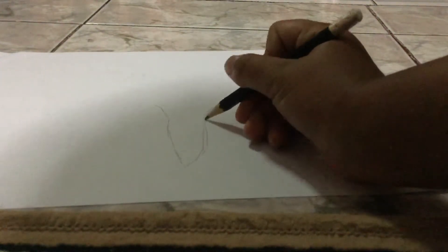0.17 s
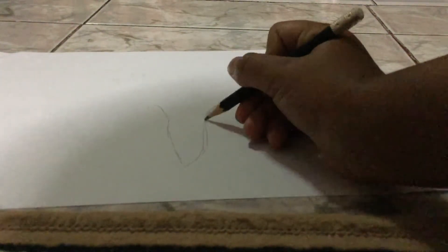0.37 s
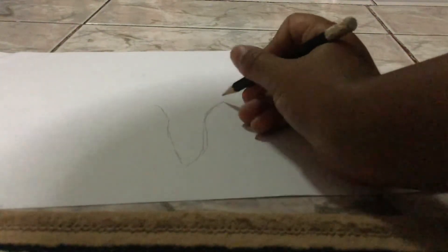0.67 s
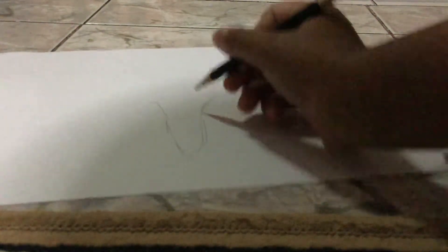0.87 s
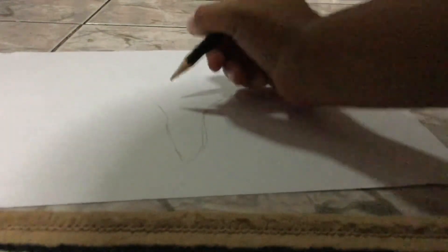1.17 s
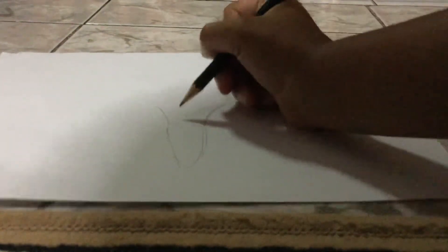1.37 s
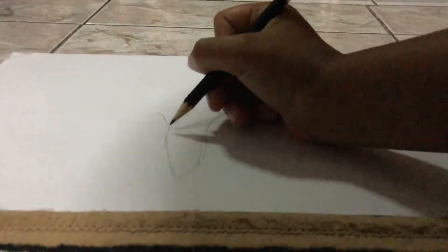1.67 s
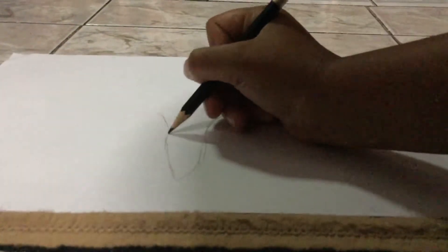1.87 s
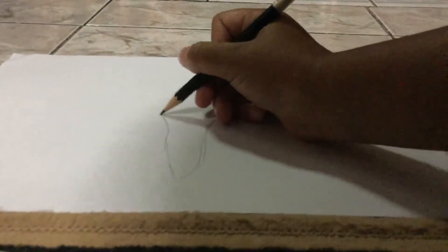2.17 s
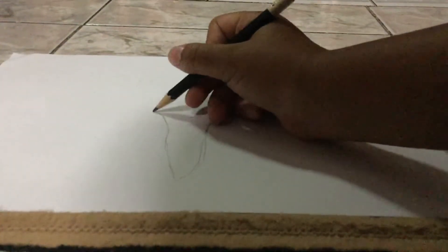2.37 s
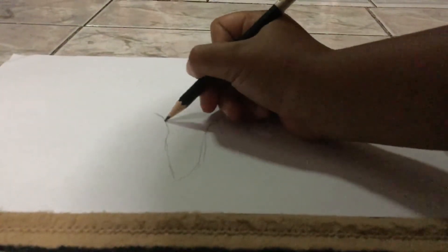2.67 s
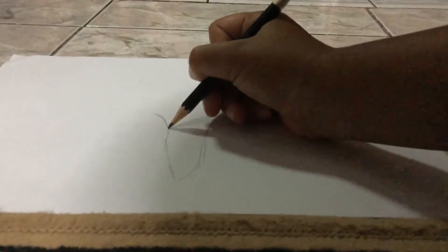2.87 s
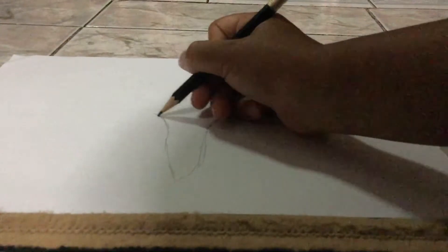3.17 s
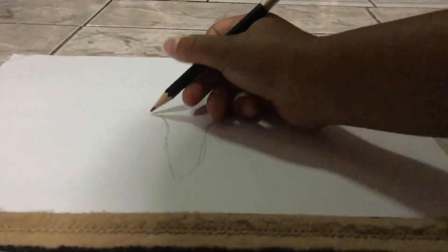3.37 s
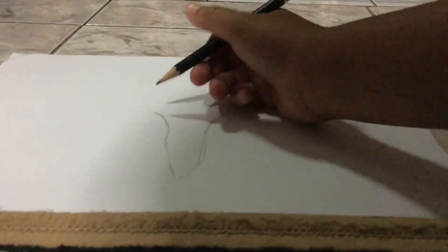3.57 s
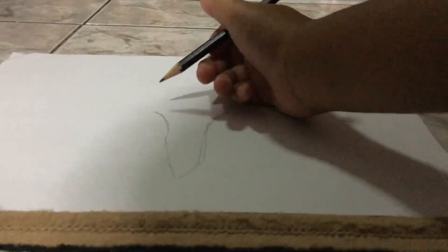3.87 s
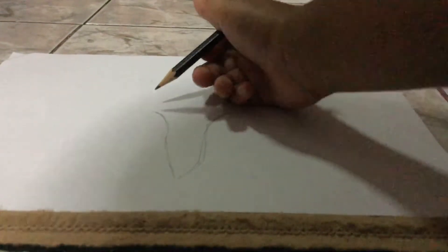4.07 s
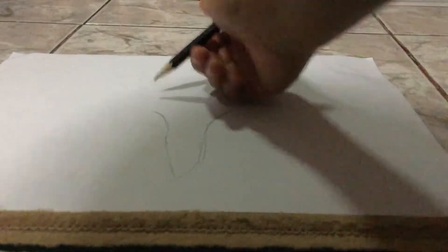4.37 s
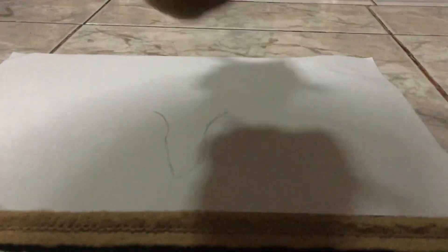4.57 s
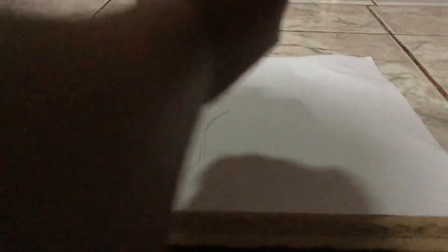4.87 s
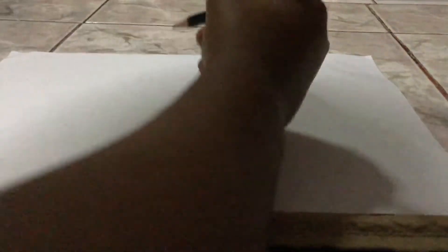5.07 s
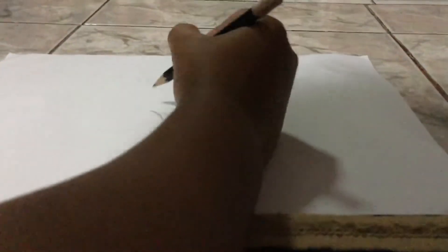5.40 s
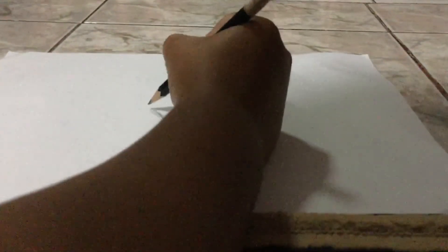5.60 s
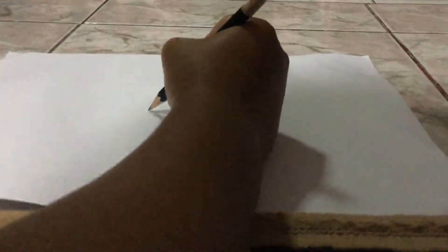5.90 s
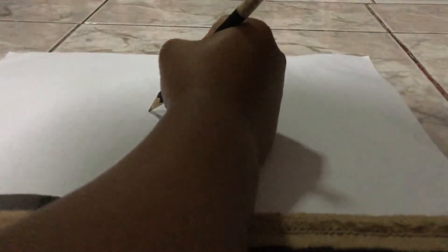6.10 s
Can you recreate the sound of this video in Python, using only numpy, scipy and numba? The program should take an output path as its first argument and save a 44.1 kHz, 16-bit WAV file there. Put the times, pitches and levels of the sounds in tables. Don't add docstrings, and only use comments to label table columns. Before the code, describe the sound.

Close to the microphone in a tiled room, a pencil makes short bright hissing strokes on paper. The hand slides softly, then lighter strokes follow. Soft low thumps ring through the floor as the hand shifts, and suddenly a forearm scrapes hard over a rug, by far the loudest sound, drags again and settles with faint crackles. A low machine rumble runs underneath, dipping briefly after the scrape.

```python
import sys
import numpy as np
from scipy import signal
from scipy.fft import rfft, irfft, next_fast_len
from scipy.io import wavfile
from scipy.ndimage import uniform_filter1d, map_coordinates
from numba import njit

SR = 44100
rng = np.random.default_rng(int(sys.argv[2]) if len(sys.argv) > 2 else 0)


def unload_wav(signal):
    wavfile.write(
        sys.argv[1],
        SR,
        np.round(np.clip(np.atleast_2d(signal).T, -1, 1) * 32767).astype(np.int16),
    )


def level_to_linear(level):
    exponent = np.asarray(level, float) / 20
    return 10 ** exponent


N = 275183
T, M = np.arange(N) / SR, next_fast_len(N)
HZ = np.maximum(np.arange(M // 2 + 1) * SR / M, 1)


def unit(x):
    return x / np.sqrt(np.mean(x ** 2))


def walk(rate_hz):
    hold = int(SR / rate_hz)
    steps = np.repeat(rng.standard_normal(N // hold + 1), hold)
    slewed = uniform_filter1d(uniform_filter1d(steps, hold), hold)
    return unit(slewed[:N])


def colour(x, curve, lo_hz, hi_hz):
    hz, db = np.transpose(curve)
    gain = level_to_linear(np.interp(np.log(HZ), np.log(hz), db))
    in_band = (HZ > lo_hz) * (HZ < hi_hz)
    gain = gain / np.sqrt(np.mean(gain ** 2 * in_band))
    return irfft(rfft(x, M) * gain, M)[:N]


@njit
def svf(x, hz, width):
    y, band, low = np.empty(len(x)), 0., 0.
    for i in range(len(x)):
        g, damping = np.tan(np.pi * hz[i] / SR), width / hz[i]
        v = (band + g * (x[i] - low)) / (1 + g * (g + damping))
        band, low = 2 * v - band, low + 2 * g * v
        y[i] = damping * v
    return y


def split(x, *edges_hz):
    spectrum = rfft(x, M)
    lows = [irfft(spectrum / (1 + (HZ / hz) ** 8), M)[:N] for hz in edges_hz]
    lows = [0] + lows + [x]
    return [high - low for low, high in zip(lows, lows[1:])]


def tilt(x, edges_hz, *dbs):
    return sum(band * level_to_linear(db + 0.6 * walk(25)) for band, db in zip(split(x, *edges_hz), dbs))


def controls(rows, attack_s, release_s):
    t, power, lean = T[::16], 1e-14, 0
    for start, length, in_db, out_db, *slant in rows:
        end = start + length
        edges = np.clip((t - start) / attack_s, 0, 1) * np.clip((end - t) / release_s, 0, 1)
        drift = level_to_linear(np.interp(t, (start, end), (in_db, out_db)))
        one = (edges ** 1.06 * drift) ** 2
        power = power + one
        lean = lean + one * sum(slant)
    level_db = np.clip(10 * np.log10(power), -80, 0)
    return [np.interp(T, t, c) for c in (np.sqrt(power), level_db, lean / power)]


def fibres(spread_db, judder_hz, judder_db):
    grain = rng.standard_normal(N)
    catch_db = spread_db * rng.exponential(size=N)
    return unit(grain * level_to_linear(catch_db + judder_db * walk(judder_hz)))


def echo(x, twice):
    # (time [s], lag [ms])
    hand_lag = [(0, .665), (.62, .66), (.95, .685), (1.92, .402), (2.06, .386), (2.28, .373), (2.52, .36),
                (2.98, .385), (3.3, .381)]
    s, lag_ms = np.transpose(hand_lag)
    lag = np.interp(T, s, lag_ms) * SR / 1000
    share = .25

    def late(v, trips):
        return map_coordinates(v, [np.arange(N) - trips * lag], order=1, mode="nearest")

    once = x - share * late(x, 1.0)
    repeats = sum((twice * share) ** k * late(once, 2 * k) for k in (1, 2, 3))
    return unit(once + repeats)


def pockets(x, hz_list, ring_db):
    rings = 0
    for hz in hz_list:
        ring_gain = level_to_linear(ring_db + 4.0 * walk(25))
        rings = rings + ring_gain * svf(x, hz * (1 + 0.018 * walk(10)), hz / 12.0)
    return unit(x + rings)


def near_strokes():
    # (start [s], length [s], level in [dB], level out [dB], slant [dB])
    strokes = [
        (-.03, .11, -59.5, -59.5, -4.5),
        (.045, 0.11, -58.5, -57, -8),
        (.125, 0.16, -72, -77.5, -1),
        (.35, .17, -70, -61, -0.5),
        (.48, 0.14, -57.5, -56.5, -3),
        (.805, 0.093, -74, -58, 1),
        (.875, .05, -55, -53, -3),
        (.9, 0.057, -56, -79, 2),
    ]
    # (frequency [Hz], level [dB per Hz])
    lead_curve = [(1470, -25), (2500, -22), (3130, -25.5), (3920, -15), (5920, -16.5), (8460, -2.5),
                  (9510, -5), (10400, -14.5), (12900, -17.5), (16000, -35)]
    gain, db, slant = controls(strokes, attack_s=.035, release_s=.022)
    rub = colour(echo(fibres(1.9, 60, 1.0), 0.18), lead_curve, 7650, 9700)
    low_db = slant - 0.23 * (db + 64.5)
    top_db = -2.0 - .5 * (db + 54)
    return gain * tilt(rub, (7000, 10300), low_db, 0, top_db)


def room():
    # (time [s], level [dB])
    ride = [(0.0, -63.5), (0.62, -64.5), (2.35, -63.5), (3.89, -65), (4.17, -64), (4.6, -64), (4.88, -71.5),
            (5.05, -61), (5.14, -69), (5.35, -75), (5.91, -64), (6.24, -65)]
    # (frequency [Hz], level [dB per Hz])
    tone_curve = [(18, -37.5), (30, -13.5), (50, -4), (81, -2.5), (194, -0.5), (600, -25), (937, -25.5),
                  (1160, -21.5), (1390, -27), (1630, -26.5), (1860, -30), (3870, -34), (7670, -35.5),
                  (8520, -33.5), (13000, -44.5), (16000, -47)]
    # (frequency [Hz], width [Hz], level [dB])
    rumble_modes = [(78.6, 28, -6.5), (193.2, 27, -4), (247, 38, -2.5), (310, 140, -8.5)]
    hiss_db = -62.5
    s, rumble_db = np.transpose(ride)
    noise = rng.standard_normal(N)
    modes = 0
    for hz, width, db in rumble_modes:
        throb = level_to_linear(db + 0.89 * walk(18))
        modes = modes + throb * svf(noise, hz * (1 + 0.023 * walk(2.4)), 1. * width)
    rumble, hiss = split(colour(noise + level_to_linear(2.0) * modes, tone_curve, 110, 400), 450)
    rumble_gain = level_to_linear(np.interp(T, s, rumble_db) - 1.0 + 1.3 * walk(30))
    return rumble * rumble_gain + hiss * level_to_linear(hiss_db)


def heel():
    # (start [s], length [s], level in [dB], level out [dB])
    shifts = [
        (.37, 0.18, -83, -84),
        (1.37, 0.23, -76, -72.5),
        (1.6, 0.25, -70.5, -79),
        (3.12, 0.4, -79, -75),
        (3.4, 0.2, -79, -70),
        (4.85, 0.272, -78, -75),
        (5.6, 0.673, -77.5, -75.5),
    ]
    # (frequency [Hz], level [dB per Hz])
    dull_curve = [(300, -53), (550, -1.5), (800, 0), (1200, -2), (1700, -4), (2300, -13), (4000, -29)]
    gain = controls(shifts, attack_s=.07, release_s=.055)[0]
    return gain * colour(fibres(1.2, 37.0, 2.4), dull_curve, 600, 2200)


def thumps():
    # (time [s], peak [dB], pitch [Hz], ring time [s])
    pushes = [(0.449, -65, 86.1, 0.12), (1.277, -55, 105, 0.13), (1.517, -54.5, 150, 0.13),
              (3.382, -52, 102, 0.21), (3.606, -46.5, 90, 0.13), (3.69, -49.5, 87.5, 0.14),
              (3.738, -45.5, 78.1, 0.082), (4.181, -35.5, 87, 0.085), (4.377, -46, 86.1, 0.097),
              (4.735, -42, 87, 0.11), (5.035, -44.5, 83, 0.095)]
    out, t = np.zeros(N + 20000), np.arange(20000) / SR
    for s, db, hz, t60 in pushes:
        phase = 2 * np.pi * hz * (.8 * t + 0.0077 * (1 - np.exp(-t / .006)))
        shape = (1 - np.exp(-t / .004)) * np.exp(-np.log(1000) * t / t60)
        out[int(s * SR):][:20000] += level_to_linear(db + 1.0) * np.sin(phase) * shape
    return out[:N]


def ticks():
    # (time [s], peak [dB], centre [Hz], width [Hz], ring time [s])
    snaps = [(0.8696, -44, 8500, 5000, 0.027), (0.9118, -37, 7260, 5900, .007),
             (.928, -48.5, 8400, 2500, 0.011), (1.2357, -59, 9400, 5000, 0.0092),
             (2.9892, -59, 9600, 1500, .015), (3.24, -62, 7500, 1200, 0.029),
             (3.598, -53.5, 10800, 9000, .005), (4.181, -62, 4150, 1200, 0.022),
             (5.5677, -51.5, 4940, 6000, 0.042), (6.0865, -52, 3750, 2494, 0.027),
             (6.166, -51, 4190, 2500, .02)]
    out, t = np.zeros(N + 2000), np.arange(2000) / SR
    for s, db, hz, width, t60 in snaps:
        burst = rng.standard_normal(2000) * np.exp(-np.log(1000) * t / t60)
        for _ in range(2):
            burst = svf(burst, np.full(2000, 1. * hz), 1. * width)
        out[int(s * SR):][:2000] += level_to_linear(db) * burst / np.abs(burst).max()
    return out[:N]


def slides():
    # (start [s], length [s], level in [dB], level out [dB], slant [dB])
    moves = [
        (1.055, 0.092, -78, -75, -10),
        (1.225, 0.043, -67, -64, -5),
        (1.26, 0.1, -70.5, -79.5, -3),
        (1.33, 0.11, -77, -60, -4),
        (1.395, 0.18, -64, -63, 0.5),
        (1.545, 0.19, -60.5, -85.5, 1.5),
        (1.82, .07, -92, -83, -2),
    ]
    # (frequency [Hz], level [dB per Hz])
    skin_curve = [(1180, -43), (2000, -19), (2280, -19), (2420, -16), (4990, -0.5), (6590, -7),
                  (8400, -0.5), (12300, -10.5), (16000, -29)]
    gain, db, slant = controls(moves, attack_s=.035, release_s=.03)
    skin = pockets(fibres(2.1, 44.75, 1.8), (3206, 5610, 8400, 11500), -19.0)
    rub = colour(skin, skin_curve, 7300, 10000)
    return gain * tilt(rub, (7000, 10300), slant - 2.5, 0, 0.6 - .2 * (db + 68))


def far_strokes():
    # (start [s], length [s], level in [dB], level out [dB], slant [dB])
    strokes = [
        (1.9, 0.21, -74, -68, -3),
        (2.07, 0.2, -72.5, -78, -0.5),
        (2.19, 0.1, -79, -74.5, -3.5),
        (2.51, 0.308, -77, -74, 0),
        (2.8, 0.11, -91, -72, -2),
        (2.98, 0.11, -65.5, -67, 3),
        (3.07, .11, -72, -60.5, 1),
        (3.14, 0.08, -70, -85, 4),
        (3.195, 0.098, -69, -80.5, 3),
    ]
    # (frequency [Hz], level [dB per Hz])
    light_curve = [(1800, -49), (3200, -19.5), (4200, -8), (5500, -2), (7400, -8.5), (8400, 5), (9200, 1),
                   (10200, -0.5), (12000, -1.5), (14000, -8), (16000, -28)]
    gain, db, slant = controls(strokes, attack_s=.035, release_s=.025)
    rub = colour(echo(fibres(1.5, 50, 1.5), 1.6), light_curve, 7200, 9900)
    low_db = slant + 3.0 - 0.12 * (db + 76)
    top_db = -3.0 - 0.25 * (db + 66)
    return gain * tilt(rub, (7000, 10300), low_db, 0, top_db)


def scrapes(gain, weight, spectrum, body_db, rasp_db, top_db):
    pile = pockets(fibres(1.3, 200, 1.4), (1296, 2306, 3350, 9000), -7.5)
    rub = colour(pile, spectrum, 5270, 11000)
    rasp = 0.55 * weight + rasp_db
    return gain * tilt(rub, (2500, 5300, 10300), weight + body_db, rasp, 0, top_db)


def jerk():
    # (time [s], level [dB], weight [dB])
    pull = [
        (4.704, -80, 10),
        (4.716, -64, 12),
        (4.719, -34.5, 0),
        (4.73, -31.5, -1),
        (4.766, -28.5, 0),
        (4.808, -31, -10.5),
        (4.827, -37.5, -11.5),
        (4.848, -77.5, 2.5),
        (4.89, -90, 11),
    ]
    # (frequency [Hz], level [dB per Hz])
    pull_curve = [(240, -61), (420, -27), (700, -8.5), (1200, -5), (1800, 0.5), (2600, -2.5), (3800, -6),
                  (4600, -8.5), (6500, -7.5), (8700, -3), (10200, -9), (12800, -9), (14200, -13.5),
                  (16000, -12.5)]
    s, db, weight = np.transpose(pull)
    gain = level_to_linear(np.interp(T, s, db, -140, -140))
    return scrapes(gain, np.interp(T, s, weight), pull_curve, body_db=1.1, rasp_db=1.6, top_db=.8)


def drags():
    # (start [s], length [s], level in [dB], level out [dB], weight
    # [dB])
    moves = [(5.101, 0.1, -54.5, -40, 6.5), (5.18, 0.094, -41.5, -57.5, 3.5),
             (5.245, 0.095, -50.5, -57.5, -1), (5.31, 0.073, -66, -82, 6), (5.358, 0.098, -67, -63, 1.5),
             (5.432, .11, -58, -85, 10), (5.495, 0.086, -77, -80, 10), (5.558, .04, -64, -68.5, 8),
             (5.6, 0.17, -95, -95, 20), (5.865, 0.083, -81, -67, -1.5), (5.92, 0.085, -72, -74, 0.5),
             (6.0, 0.089, -73.5, -76.5, -1), (6.072, 0.074, -67, -77, 16), (6.115, 0.083, -78, -73, 17),
             (6.2, .06, -81, -78, 1)]
    # (frequency [Hz], level [dB per Hz])
    pile_curve = [(240, -49), (420, -20.5), (700, -4.5), (1250, 0), (2200, -6), (3300, -5.5), (4600, -9.5),
                  (6500, -10.5), (8500, -7.5), (10200, -12), (12500, -9.5), (16000, -18)]
    gain, _, weight = controls(moves, attack_s=.02, release_s=.024)
    rasp_db = 0.47 * np.maximum(weight - 11.5, 0) - 3.5
    top_db = 2.2 - 0.87 * np.abs(weight - 10.5)
    return scrapes(gain, weight, pile_curve, -3.0, rasp_db, top_db)


def scene():
    pencil = near_strokes() + far_strokes()
    hand = slides() + heel()
    forearm = jerk() + drags()
    close = pencil + hand + forearm + ticks()
    t = np.arange(3000) / SR
    tail = rng.standard_normal(3000) * np.exp(-np.log(1000) * t / .04) * level_to_linear(-55.0)
    tiles = signal.fftconvolve(close, tail)[:N]
    return (close + tiles + thumps() + room())[None]


def low_pass(x):
    return signal.sosfilt(signal.butter(12, 16660, fs=SR, output="sos"), x)


def record(dry):
    # (low cut [Hz], high cut [Hz])
    mic_edges = [45, 15620]
    low_cut = signal.butter(2, mic_edges[0], "high", fs=SR, output="sos")
    high_cut = signal.ellip(10, .2, 70, mic_edges[1], fs=SR, output="sos")
    mix = signal.sosfilt(high_cut, signal.sosfilt(low_cut, dry))
    return low_pass(mix)


dry = scene()
out = record(dry)
unload_wav(out)
```